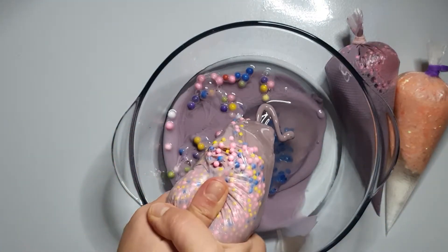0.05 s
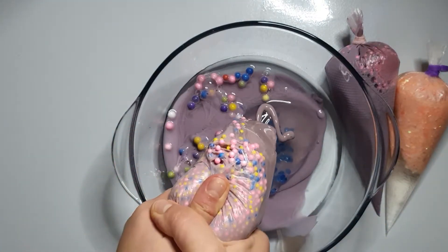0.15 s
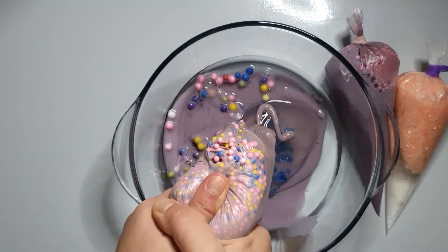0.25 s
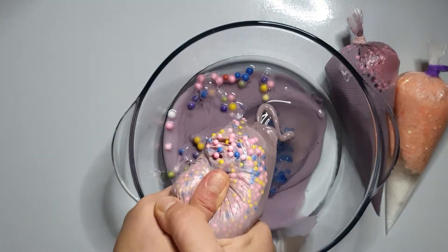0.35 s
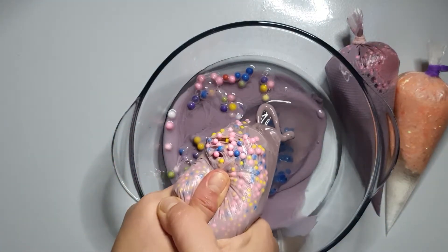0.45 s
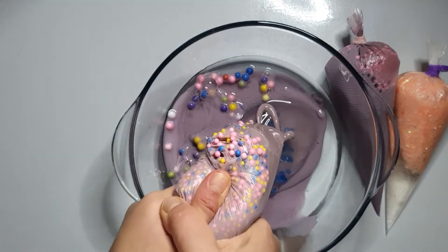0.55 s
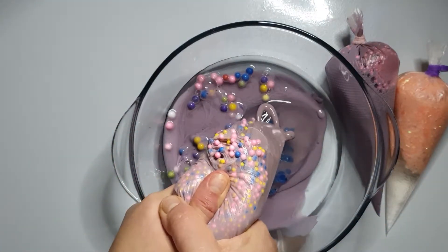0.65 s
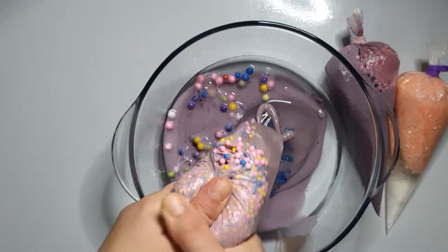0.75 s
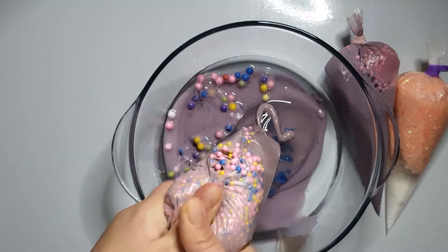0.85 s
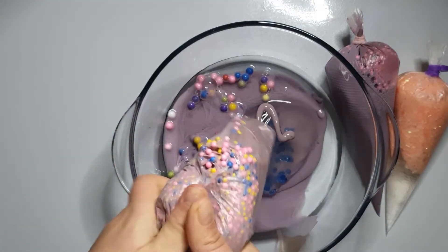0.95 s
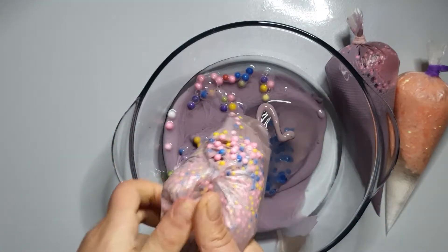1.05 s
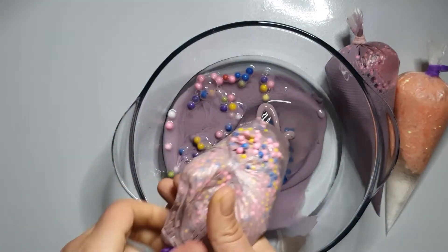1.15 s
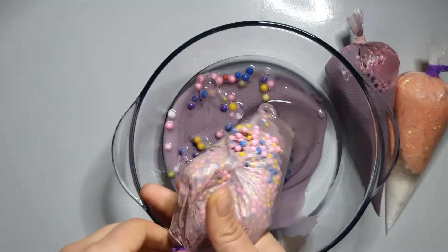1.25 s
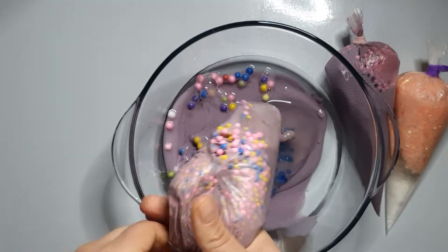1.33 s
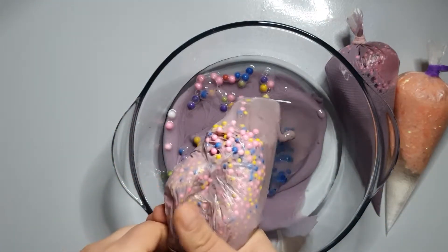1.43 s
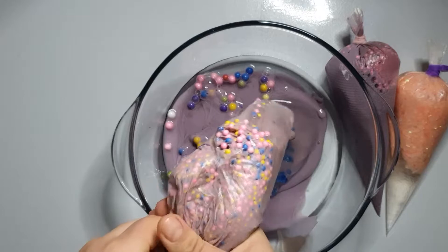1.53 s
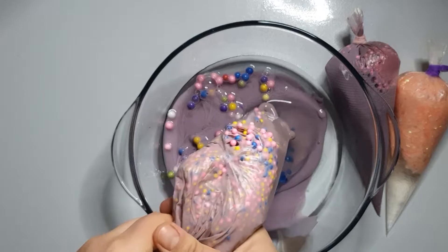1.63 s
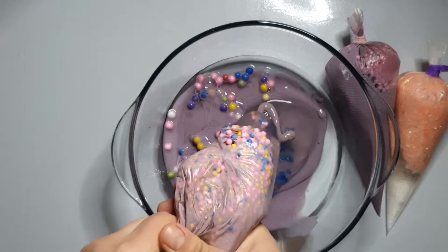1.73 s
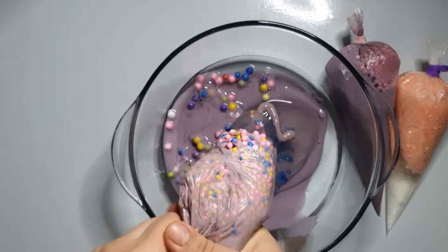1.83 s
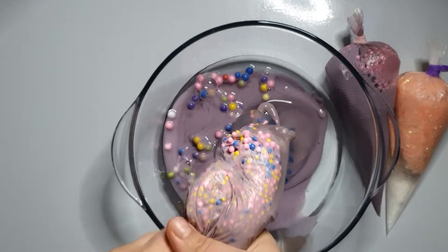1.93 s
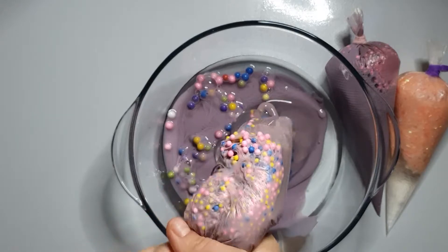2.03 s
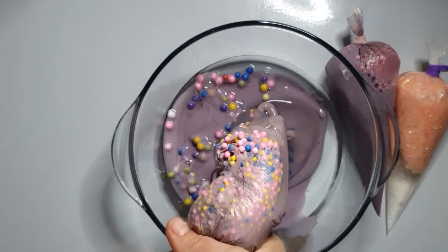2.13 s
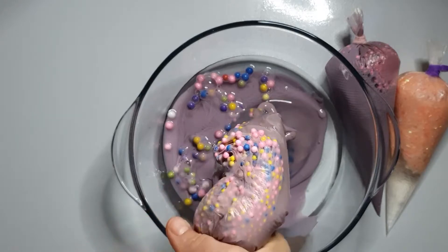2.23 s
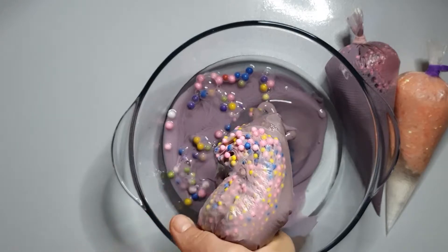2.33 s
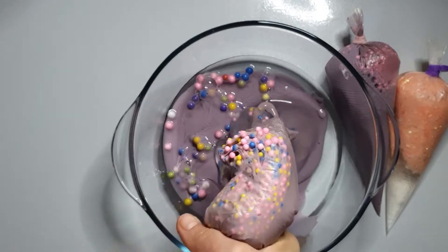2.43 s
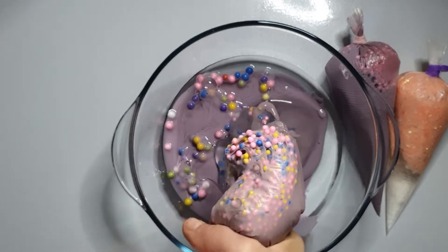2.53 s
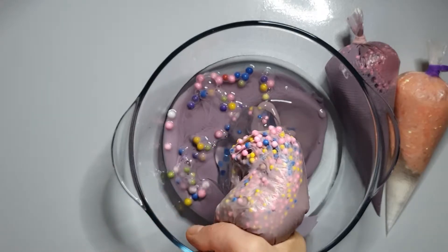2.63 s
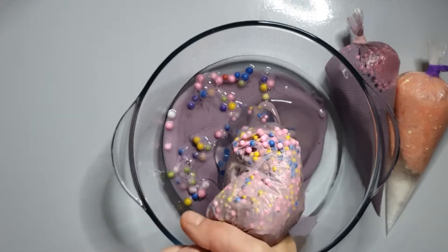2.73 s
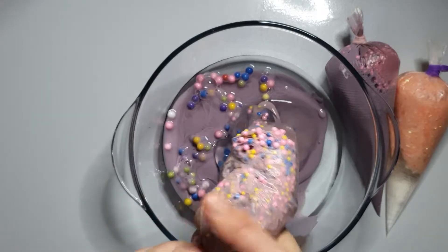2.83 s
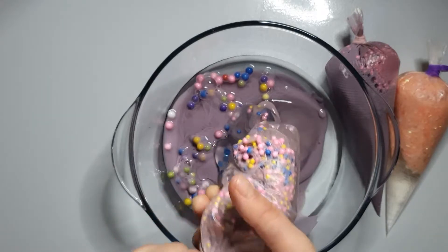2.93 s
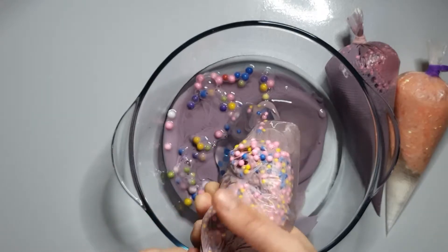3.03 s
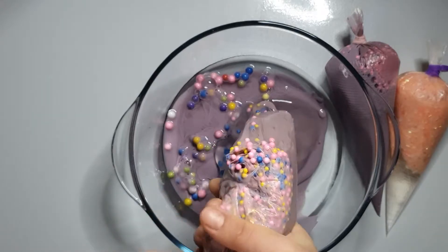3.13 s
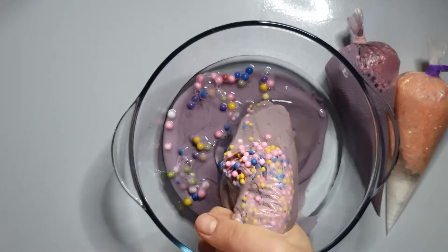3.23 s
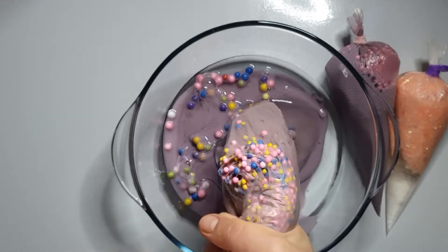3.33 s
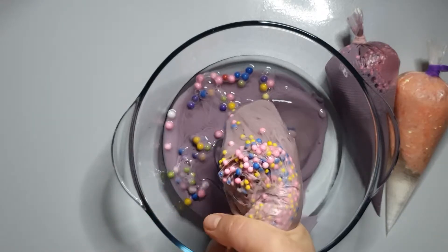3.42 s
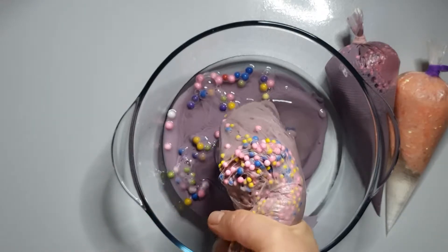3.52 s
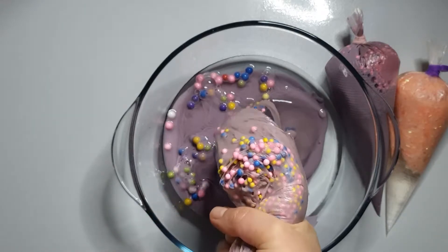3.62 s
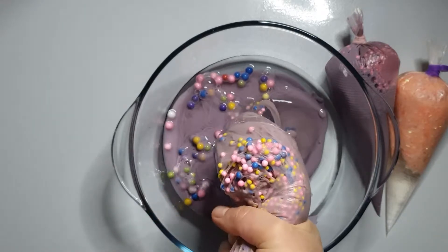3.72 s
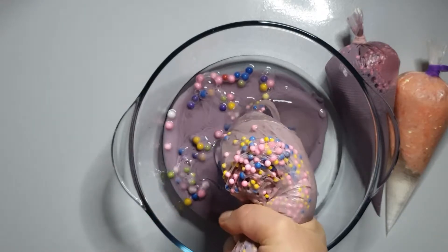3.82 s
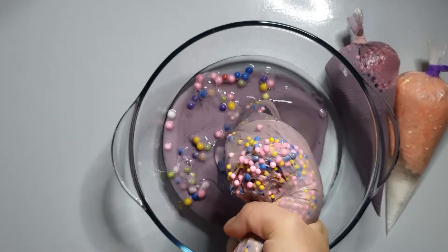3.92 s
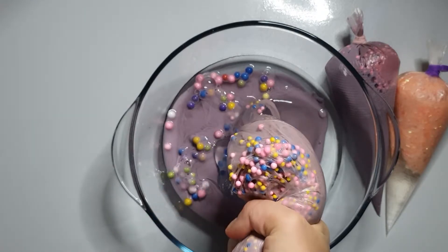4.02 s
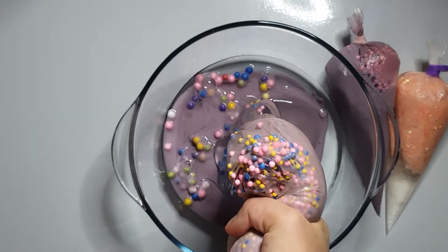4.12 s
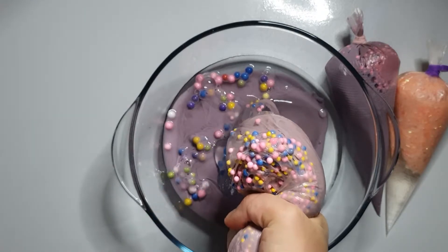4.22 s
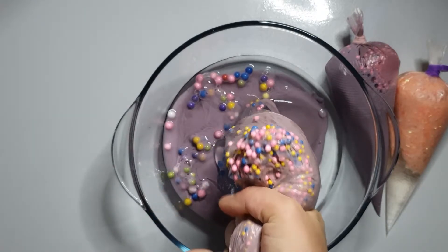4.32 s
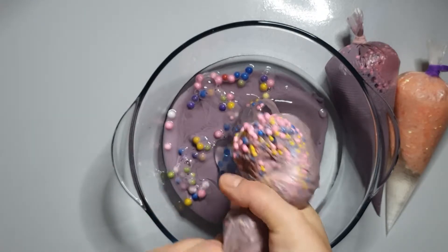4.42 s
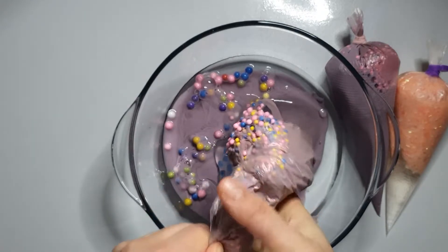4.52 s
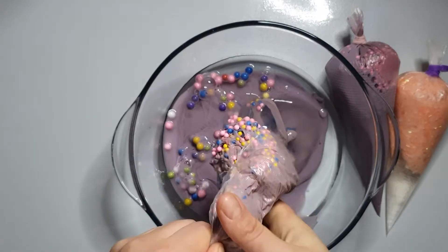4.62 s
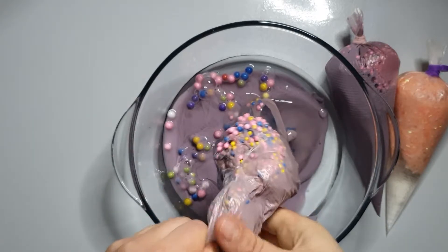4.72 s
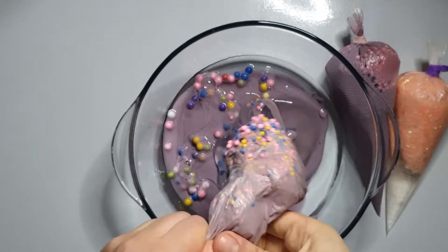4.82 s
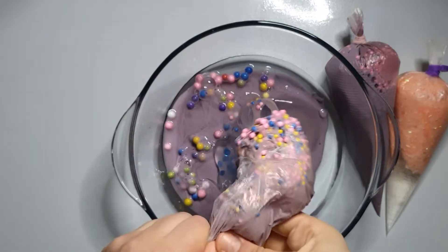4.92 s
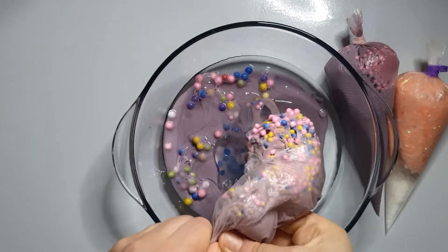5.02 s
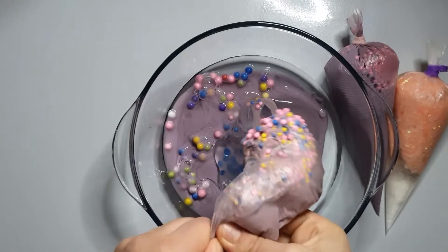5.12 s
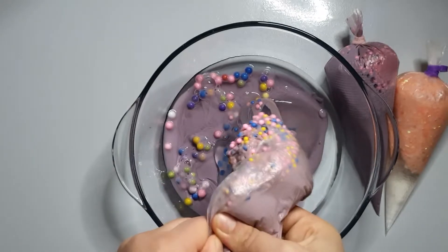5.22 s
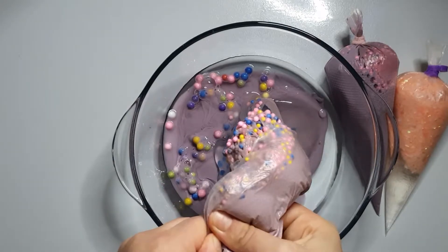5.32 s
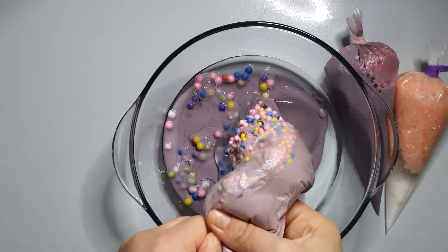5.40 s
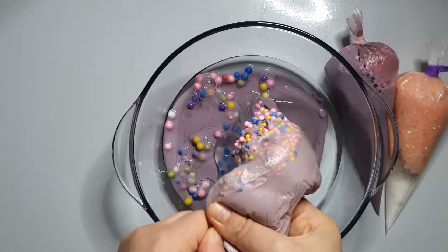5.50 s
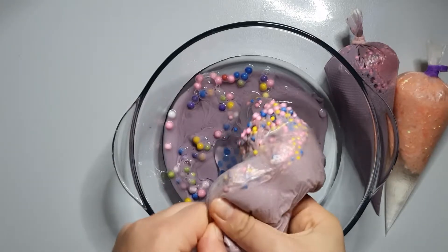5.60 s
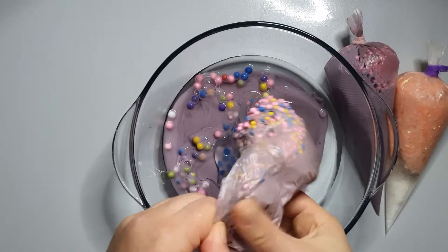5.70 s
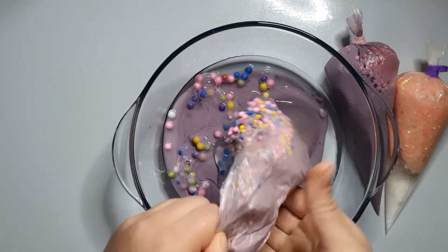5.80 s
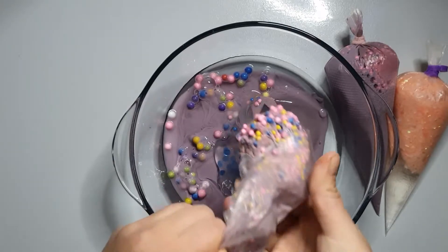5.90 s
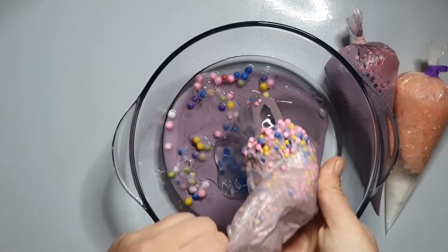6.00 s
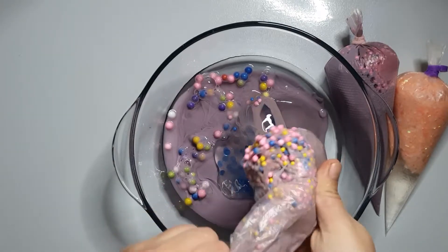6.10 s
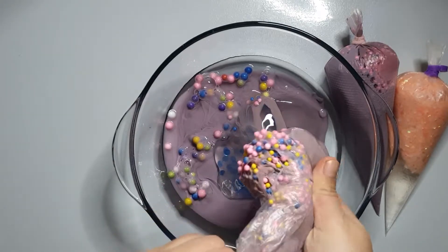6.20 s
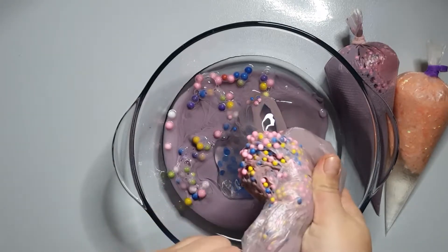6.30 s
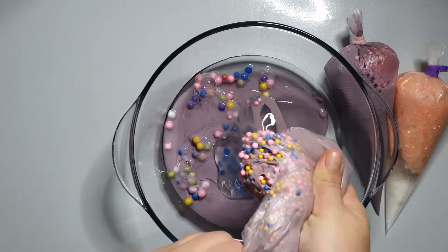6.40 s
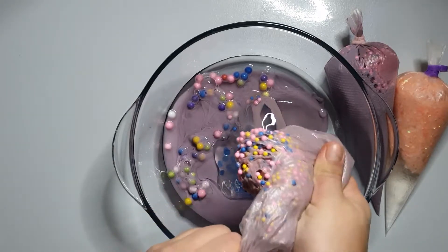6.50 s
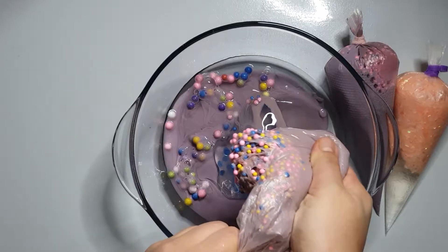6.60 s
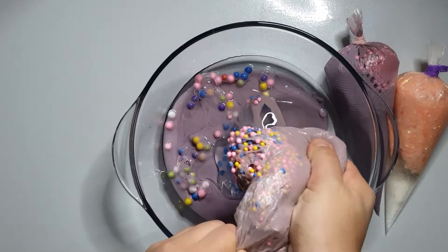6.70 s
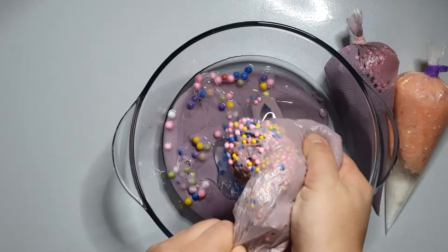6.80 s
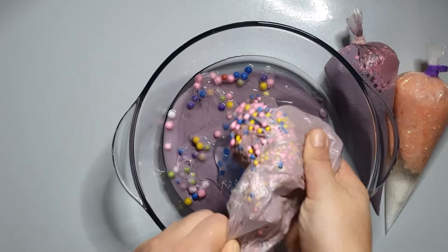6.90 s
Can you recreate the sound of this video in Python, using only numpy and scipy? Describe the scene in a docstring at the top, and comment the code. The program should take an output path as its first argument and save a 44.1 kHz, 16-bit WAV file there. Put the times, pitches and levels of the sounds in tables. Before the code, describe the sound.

Close, bright plastic crinkling starts faint, then comes in uneven bursts with soft low squelches as hands squeeze a beaded slime bag.

```python
"""A thin plastic bag of soft slime crackles as hands knead it over a glass bowl in a quiet room.
Creases in the film snap as short bursts of noise and ringing, crowding into crackle with each squeeze.
Lumpy noise through the hollow of the bowl makes the low squelch, and filtered noise the late, fading rub.
Bag and slime get early echoes and a short tail; faint tones, table rumble and room tone lie under them."""
import sys
import numpy as np
from scipy import signal
from scipy.fft import rfft, irfft
from scipy.io import wavfile

SR = 44100
rng = np.random.default_rng(int(sys.argv[2]) if len(sys.argv) > 2 else 0)


def attenuation_scalar(level_db):
    """Turn a level in dB into a linear amplitude multiplier (20 dB per decade)."""
    decades = np.asarray(level_db, float) / 20
    return 10 ** decades


def put_to_file(sound):
    """Save the sound as 16-bit audio at rate SR, in the file named by the first command-line argument."""
    columns = np.atleast_2d(sound).T  # one column per channel
    safe = np.clip(columns, -1, 1)
    whole_steps = np.round(safe * 32767)
    wavfile.write(sys.argv[1], SR, whole_steps.astype(np.int16))


N = 306495

RIGHT_LAG_S, LAG_SPREAD_S = 0.000085, 0.00005   # mean and spread of the right microphone's delay


def rms_one(x):
    """Scale to unit rms."""
    return x / np.sqrt(np.mean(x ** 2) + 1e-20)


def band(x, low_hz, high_hz):
    """Butterworth band-pass."""
    sos = signal.butter(2, [low_hz, min(high_hz, 0.45 * SR)], "band", fs=SR, output="sos")
    return signal.sosfilt(sos, x)


def resonance(x, hz, width_hz):
    """Two-pole resonance with gain 1 on top."""
    r = np.exp(-np.pi * width_hz / SR)
    top = np.array([1, 0, -1]) * (1 - r * r) / 2
    return signal.lfilter(top, [1, -2 * r * np.cos(2 * np.pi * hz / SR), r * r], x)


def drift(rate_hz):
    """Slow random wandering of unit rms: noise through two equal one-pole low-passes."""
    r = np.exp(-2 * np.pi * rate_hz / SR)
    noise = rng.standard_normal(N + SR)
    return rms_one(signal.lfilter([1], [1, -2 * r, r * r], noise)[SR:])   # drop a second of run-in


def bump(centre_s, width_s):
    """Bell-shaped swell of height 1."""
    return np.exp(-0.5 * ((np.arange(N) / SR - centre_s) / width_s) ** 2)


def curve(table, times):
    """The columns of a table read at given times."""
    s, *columns = np.transpose(table)
    return [np.interp(times, s, c) for c in columns]


# Dull, middle and bright bands of the plastic film.
# Each row: low edge in Hz, high edge in Hz, typical fall in s, typical rise in s, relative level in dB.
FILM_BANDS = [(1117, 2140, 0.001, 0.00035, -8.5), (2407, 5320, 0.0015, 0.00055, -6),
              (6160, 14050, 0.0016, 0.00022, -3.5)]
# Thump of the slime behind the film. One row: low edge in Hz, high edge in Hz, typical fall in s,
# typical rise in s, relative level in dB. Rise and fall far outlast the 10 ms burst, so it stays flat.
SLIME_THUMP = (377, 1050, 0.6, 1.39, -10)


def film(times, band_db, pan_db, lag_s):
    """Each snap creeps up, cracks and rattles out in every band, ringing at a pitch of its own."""
    lead, length = 80, 440   # samples before the crack, and in all
    steps = np.arange(length)
    age = (steps - lead) / SR
    out = np.zeros((2, N))
    left = np.round(times * SR).astype(int)
    starts = left, left + np.round(lag_s * SR).astype(int)
    chance = rng.standard_normal((2, len(times), 1))
    slow_rise, slow_fall = np.exp(0.6 * chance[0]), np.exp(0.25 * chance[1])
    rattle = rng.standard_normal((len(times), length))   # one crack feeds all bands
    # the thump sounds only when a fourth level is given
    for (low_hz, high_hz, fall_s, rise_s, level_db), db in zip([*FILM_BANDS, SLIME_THUMP], band_db):
        shape = np.exp(np.where(age < 0, age / (rise_s * slow_rise), -age / (fall_s * slow_fall)))
        pitch_hz = low_hz * (high_hz / low_hz) ** rng.random((len(times), 1))
        # the freed patch of film tightens as it rings
        ring = np.sin(2 * np.pi * pitch_hz * age * (1 + 30 * age))
        burst = (rattle + 0.5 * ring) * shape
        burst = band(band(burst, low_hz, high_hz), low_hz * 0.89, high_hz * 1.185)
        around_crack = burst[:, lead - 20:lead + 80]
        burst /= np.sqrt(np.mean(around_crack ** 2, axis=1, keepdims=True))
        for side, sign in enumerate((0.5, -0.5)):
            gain = attenuation_scalar(db + level_db + sign * pan_db)[:, None]
            at = np.maximum(starts[side], 0)[:, None] + steps
            train = np.bincount(at.ravel(), (burst * gain).ravel(), N + 2 * length)
            out[side] += train[lead:lead + N]   # the crack itself lands on the given time
    return out


# How hard the hands squeeze; it drives crackle and squelch. Each row: time in s, drive level in dB.
SQUEEZE = [(0.0, -78), (0.48, -70.5), (0.64, -76.5), (0.81, -67.5), (0.85, -54.5), (0.91, -48.5),
           (1.06, -71), (1.2, -59), (1.3, -68.5), (1.45, -51), (1.72, -70), (1.82, -48), (2.19, -48),
           (2.46, -60), (2.65, -74), (2.75, -51.5), (3.0, -63), (3.21, -43.5), (3.42, -47), (3.48, -53.5),
           (3.75, -64), (4.28, -75), (4.43, -44.5), (4.59, -56.5), (4.65, -68.5), (5.01, -37), (5.08, -54),
           (5.13, -42), (5.48, -51), (5.57, -72.5), (5.69, -35), (5.83, -55), (6.06, -60), (6.12, -42),
           (6.3, -49), (6.45, -52.5), (6.64, -64.5), (6.72, -61), (6.82, -66), (6.95, -60)]
# How the bag is held. Each row: time in s, dull band against the crackle in dB,
# bright band against the crackle in dB, squelch against the squeeze in dB.
HOLD = [(0.0, 2, 7.5, -17), (0.5, 0.5, -0.5, -18), (0.9, -2.5, 4.5, -24), (1.4, -7, -0.5, -20.5),
        (1.9, -6, 0.5, -36), (2.4, -6.5, -1, -26), (2.9, -7, 2.5, -29), (3.3, -3, 2.5, -26),
        (3.6, -3.5, 4, -24), (4.1, -7, 7, -15), (4.45, -3.5, 2, -18), (4.85, -12.5, -1.5, -22.5),
        (5.1, -6.5, 0.5, -22), (5.45, -6, 0, -20.5), (5.7, -8, 1.5, -16), (5.95, -3.5, 0.5, -19.5),
        (6.25, -5.5, -1, -16.5), (6.5, -4.5, 0, -25.5), (6.95, -0.5, 7.5, -20)]


def crackle():
    """Small snaps come in clumps, at random, each with its own size, colour and place."""
    most_per_s, count = 2500, 17400   # candidates, thinned below to the wanted rate
    usual_per_s, usual_db = 650, -50   # snap rate at the usual squeeze, before clumping
    crowding = 0.15   # dB of rate per dB of squeeze
    times = np.sort(rng.uniform(0, N / SR, count))
    size = rng.exponential(1, count)
    chance = rng.standard_normal((count, 5))
    squeeze_db, = curve(SQUEEZE, times)
    clumps_db = 3.5 * drift(35)[(times * SR).astype(int)]
    per_s = usual_per_s * attenuation_scalar(crowding * (squeeze_db - usual_db) + clumps_db)
    kept = rng.random(count) < per_s / most_per_s
    dull_db, bright_db, _ = curve(HOLD, times)
    db = squeeze_db + 3.35 * np.minimum(size, 3.5) - 6.5
    shares_db = [dull_db, 0 * times, bright_db] + 2.24 * chance[:, :3].T
    pan_db = 4.0 * chance[:, 3]
    lag_s = RIGHT_LAG_S + LAG_SPREAD_S * chance[:, 4]
    return film(times[kept], (db + shares_db)[:, kept], pan_db[kept], lag_s[kept])


# Air and glass of the bowl. Each row: resonance in Hz, width in Hz, relative level in dB.
HOLLOW = [(355, 11, -2), (410, 140, 4.5), (476, 68, 0), (618, 110, -2.5), (655, 11, -2.5), (786, 12.4, 3.5)]


def squelch():
    """Lumpy noise of moving slime sets the hollow of the bowl sounding, a little unlike on each side."""
    t = np.arange(N) / SR
    mid, side = rng.standard_normal((2, N)) * attenuation_scalar(2.5 * drift(30))
    lumps = mid + 0.35 * side * np.array([[1], [-1]])
    hollow = np.zeros((2, N))
    for hz, width_hz, db in HOLLOW:
        hollow += attenuation_scalar(db + 2.5 * drift(5)) * resonance(lumps, hz, width_hz)
    squeeze_db, = curve(SQUEEZE, t)
    _, _, squelch_db = curve(HOLD, t)
    return rms_one(hollow) * attenuation_scalar(squeeze_db + squelch_db)


def rumble():
    """The table trembles under the working hands: uneven low noise that swells at one heavier lean."""
    rest_db, lean_s, lean_width_s, lean_rise_db = -84.5, 3.3, 0.12, 19.2
    shake = band(rng.standard_normal(N) * attenuation_scalar(3.9 * drift(6.1)), 46, 326)
    return rms_one(shake) * attenuation_scalar(rest_db + lean_rise_db * bump(lean_s, lean_width_s))


# Colour of the room tone. Each row: frequency in Hz, relative spectral level in dB.
ROOM_COLOUR = [(25, 6), (108, 1), (150, -5.5), (200, -8), (400, -4.5), (620, -14), (1000, -15),
               (2550, -20.5), (7500, -17.5), (11000, -21), (16000, -21)]


def room_tone():
    """Steady rumble and hiss: shaped noise, partly shared by both sides."""
    level_db, alike = -76, 0.2   # alike: correlation between the sides
    hz = np.maximum(np.fft.rfftfreq(N, 1 / SR), 1)
    colour_hz, colour_db = np.transpose(ROOM_COLOUR)
    shape = attenuation_scalar(np.interp(np.log(hz), np.log(colour_hz), colour_db))
    shape = shape * np.minimum(hz / 40, 1) ** 5   # steep fall below 40 Hz
    mid, side = irfft(rfft(rng.standard_normal((2, N))) * shape, N)
    both = np.sqrt(1 + alike) * mid + np.sqrt(1 - alike) * side * [[1], [-1]]
    return attenuation_scalar(level_db) * rms_one(both)


# Single snaps of the film. Each row: time of the crack in s, dull level in dB, middle level in dB,
# bright level in dB, all before the level of their film band.
SNAPS = [(0.0392, -70, -58, -50), (0.1277, -75, -78, -47), (0.2487, -71, -69, -57.5),
         (0.274, -80, -57, -51.5), (0.3148, -71, -49, -44.5), (0.3567, -58, -49, -49),
         (0.3917, -66, -53, -49), (0.4657, -75, -66, -40.5), (0.5162, -49, -49, -47.5),
         (0.8658, -48, -35, -45), (0.894, -39, -26, -37), (0.8999, -35.5, -33, -31),
         (0.9074, -34, -31.5, -36), (0.926, -43, -30.5, -24), (0.9364, -38, -31.5, -36),
         (1.0044, -43.5, -33, -31.5), (1.1192, -79, -69, -43.5), (1.14, -56, -38.5, -38),
         (1.1823, -52.5, -40.5, -33), (1.194, -62, -47, -42), (1.3365, -70.5, -47, -52),
         (1.3505, -49, -35, -38.5), (1.4206, -72, -34, -31), (1.5099, -46, -33, -37),
         (1.5982, -55.5, -39.5, -48.5), (1.7632, -63, -40.5, -31), (1.7808, -61, -42.5, -38),
         (1.8135, -50, -24.5, -26), (1.8238, -57, -43, -34), (1.832, -48, -31, -24),
         (1.8739, -46, -38, -31), (1.9815, -44.5, -47, -34), (1.993, -38, -35, -21),
         (2.0453, -57, -43, -30), (2.0994, -68, -36, -42), (2.1209, -41, -34, -25),
         (2.1609, -51, -33.5, -30), (2.1882, -46, -40, -32), (2.2022, -43, -33, -38),
         (2.2264, -48, -36, -39), (2.2333, -38.5, -43, -45), (2.325, -50.5, -33.5, -32.5),
         (2.3758, -40, -42, -41), (2.3991, -44.5, -46, -44.5), (2.4364, -51, -37, -33),
         (2.469, -66, -50, -41), (2.545, -77.5, -72, -44), (2.6848, -52.5, -47, -38.5),
         (2.7127, -60, -48, -34), (2.798, -56, -45.5, -34), (2.8177, -55, -40, -33.5),
         (2.8518, -53, -35.5, -40), (2.866, -52, -46, -37), (2.887, -62.5, -47, -39.5),
         (2.9104, -45, -39, -30), (2.9355, -47.5, -42.5, -36), (2.9753, -52, -48.5, -42.5),
         (3.0265, -53.5, -44.5, -29.5), (3.058, -42, -38.5, -47), (3.0708, -52, -38, -28),
         (3.092, -49, -40, -36), (3.1082, -45, -33.5, -26), (3.116, -61, -45, -36), (3.1336, -47, -38, -36),
         (3.184, -45.5, -33.5, -44), (3.194, -37, -28, -25.5), (3.2225, -38.5, -32, -27),
         (3.2276, -49, -42, -25.5), (3.2909, -46, -36, -41), (3.3108, -47, -34, -26.5),
         (3.3324, -41, -35, -28), (3.3567, -46.5, -41, -29.5), (3.3712, -54, -41, -28),
         (3.3989, -36, -31, -23), (3.4255, -44, -57, -29), (3.4395, -52, -44, -20.5),
         (3.5661, -52, -44.5, -29), (3.664, -59, -45, -37.5), (3.746, -64, -44.5, -55),
         (3.9608, -72, -41, -34), (3.979, -69.5, -42.5, -44), (4.114, -65, -56, -48),
         (4.3014, -75, -57.5, -49.5), (4.3303, -71, -54.5, -43), (4.3897, -53, -38.5, -29.5),
         (4.425, -24.5, -25, -37), (4.5312, -45, -35.5, -39), (4.571, -45.5, -33.5, -43),
         (4.6822, -59, -57, -50), (4.752, -68, -47, -40), (4.8065, -49.5, -41.5, -39),
         (4.8786, -53.5, -30.5, -31), (4.8987, -42.5, -32, -28.5), (4.909, -46, -34, -24),
         (4.931, -50, -49, -27.5), (4.9811, -28, -51, -37), (4.9993, -34.5, -28, -17),
         (5.007, -33, -35.5, -22), (5.0276, -39, -36, -46), (5.0433, -29.5, -30, -20.5),
         (5.1026, -42, -34, -30), (5.1195, -48, -33, -30.5), (5.1738, -46.5, -28, -38),
         (5.1865, -39, -28, -32.5), (5.2842, -45.5, -26, -38), (5.2926, -40, -35.5, -25.5),
         (5.307, -40, -32, -27), (5.3529, -49.5, -44, -21), (5.3938, -53, -37.5, -30),
         (5.4, -38, -38.5, -48.5), (5.437, -41.5, -28, -45), (5.4506, -58, -44, -35),
         (5.4688, -56.5, -37.5, -36.5), (5.4949, -48.5, -35.5, -36.5), (5.5546, -69.5, -50, -44),
         (5.602, -57, -46, -35.5), (5.6688, -28, -25, -21), (5.675, -44.5, -28, -42),
         (5.708, -34, -28.5, -26), (5.7197, -36, -35, -26.5), (5.7561, -45, -31, -27),
         (5.7949, -54, -38, -34), (5.8094, -59, -36, -22), (5.8202, -51.5, -44, -32),
         (5.8625, -56, -43, -37), (5.876, -48, -23.5, -28), (5.9443, -42, -37, -46),
         (5.9609, -48, -29, -34), (5.9709, -43, -40.5, -42), (5.9973, -43, -39, -29.5),
         (6.073, -47, -47, -47), (6.0849, -34.5, -32, -27), (6.0989, -37, -32.5, -25.5),
         (6.124, -36, -31.5, -18.5), (6.1529, -33.5, -28.5, -22), (6.221, -31, -28.5, -32.5),
         (6.244, -40, -27.5, -26.5), (6.3065, -36, -28.5, -24.5), (6.3188, -54.5, -41, -23.5),
         (6.3558, -57.5, -37, -35.5), (6.4266, -53, -28.5, -28.5), (6.4367, -52, -33.5, -23.5),
         (6.5628, -58, -50, -44), (6.5933, -48, -44, -48), (6.6511, -55, -45, -36),
         (6.6672, -48.5, -41, -34.5), (6.7, -56.5, -38, -42), (6.7366, -57, -64, -39.5),
         (6.746, -55.5, -44, -33.5), (6.8656, -64, -43.5, -55.5), (6.8864, -61.5, -52.5, -39),
         (6.898, -56.5, -36, -38), (6.9076, -60.5, -39.5, -28.5), (6.9319, -49, -31.5, -25),
         (6.9475, -41, -34, -38)]


def snaps():
    """The creases loud enough to be heard alone; a dull snap also thumps the slime behind the film."""
    s, *band_db = np.transpose(SNAPS)
    _, _, squelch_db = curve(HOLD, s)
    thump_db = band_db[0] + squelch_db   # more so the more it squelches
    chance = rng.standard_normal((len(s), 2))
    lag_s = RIGHT_LAG_S + LAG_SPREAD_S * chance[:, 1]
    return film(s, [*band_db, thump_db], 2.0 * chance[:, 0], lag_s)


# Faint tones and low jolts. Each row: centre in s, width in s, mean pitch in Hz, peak level in dB.
HUMS = [(.56, 0.028, 332, -66.5), (.7, 0.068, 334, -78.5), (.75, 0.027, 387, -78), (.98, 0.047, 437, -71),
        (1.06, 0.11, 410, -76.5), (1.08, 0.031, 532, -77), (2.05, 0.033, 330, -78),
        (2.165, 0.011, 361, -67.5), (2.2, 0.012, 98.4, -54), (2.54, 0.036, 348, -75),
        (3.2, 0.032, 131.5, -69.5), (3.3, 0.052, 102.3, -80), (3.71, 0.0053, 89.3, -65),
        (5.9, 0.024, 328, -71.5), (6.03, 0.024, 406, -65), (6.13, 0.032, 379, -60.5),
        (6.82, 0.0074, 410, -69.5), (0.105, 0.0022, 5320, -62.5)]


def hums():
    """Sine tones that swell and fade, all wavering together a little in pitch."""
    wavering_s = np.cumsum(1 + 0.0137 * drift(7.7)) / SR
    out = np.zeros(N)
    for centre_s, width_s, hz, db in HUMS:
        out += attenuation_scalar(db) * bump(centre_s, width_s) * np.sin(2 * np.pi * hz * wavering_s)
    return out


def relax():
    """The bag relaxes with a hollow rub: grainy noise through two equal resonances, fading away."""
    start_s, start_db, fade_db_per_s = 3, -74.5, 14
    hz, width_hz = 1348, 303
    age = np.arange(N) / SR - start_s
    grains = rng.standard_normal(N) * attenuation_scalar(3.7 * drift(40))
    rub = resonance(resonance(grains, hz, width_hz), hz, width_hz)
    fade_in = np.clip(age / 0.03 + 1, 0, 1)   # over the 30 ms before the start
    return rms_one(rub) * attenuation_scalar(start_db - fade_db_per_s * np.maximum(age, 0)) * fade_in


# Bowl and microphone. Each row: centre in Hz, width in Hz, boost or cut in dB.
BOWL_COLOUR = [(1400, 82, -2), (1826, 102, -27), (2563, 330, 4.5), (3840, 340, 4), (4830, 4800, 1),
               (7490, 1500, -8.5), (10100, 3000, 1), (14160, 8400, -4.5)]


def colour(bag):
    """Bowl and microphone colour the film: a chain of resonant boosts and cuts."""
    for hz, width_hz, db in BOWL_COLOUR:
        bag = bag + (attenuation_scalar(db) - 1) * resonance(bag, hz, width_hz)
    return bag


# Early echoes. Each row: delay on the left in s, left level in dB, right level in dB.
ECHOES = [(.0009, -16.5, -27.5), (.0017, -22.5, -19.5), (.0028, -20.5, -26.5), (.0052, -30, -13.5)]


def surroundings(x):
    """Early echoes off glass and table, then a short, slightly softened noise tail of its own per side."""
    t60_s, tail_db = 0.2, -11   # tail_db: tail energy against the direct sound
    length = round(0.25 * SR)
    tail = rng.standard_normal((2, length)) * attenuation_scalar(-60 * np.arange(length) / SR / t60_s)
    tail = signal.lfilter([1], [1, -0.1], tail)
    tail[:, :round(0.002 * SR)] = 0
    answer = attenuation_scalar(tail_db) * tail / np.sqrt(np.sum(tail ** 2, axis=1, keepdims=True))
    answer[:, 0] = 1   # direct sound
    for delay_s, left_db, right_db in ECHOES:
        answer[0, round(delay_s * SR)] += attenuation_scalar(left_db)
        # other path to the right microphone: shorter, and inverted
        answer[1, round(delay_s * 0.87 * SR)] -= attenuation_scalar(right_db)
    return signal.fftconvolve(x, answer, axes=1)[:, :N]


def scene():
    """Bag, slime and rub in their surroundings, over tones, table and room."""
    bag = colour(crackle() + snaps()) * attenuation_scalar([[-0.4], [0.4]])   # a touch louder on the right
    over_bowl = surroundings(bag + squelch() + relax())
    return over_bowl + hums() + rumble() + room_tone()


def top_cut(x):
    """Nothing passes above the cut-off."""
    return signal.sosfilt(signal.butter(12, 16970, fs=SR, output="sos"), x)


def record(dry):
    """The very top is stepped down twice: 17 dB from 15.8 kHz, a further 60 dB from 16.8 kHz."""
    hz = np.fft.rfftfreq(N, 1 / SR)
    first_db = -17 * np.clip((hz - 15800) / 250, 0, 1)
    second_db = -60 * np.clip((hz - 16800) / 200, 0, 1)
    mix = irfft(rfft(dry) * attenuation_scalar(first_db + second_db), N)
    return top_cut(mix)


dry = scene()
out = record(dry)
put_to_file(out)
```